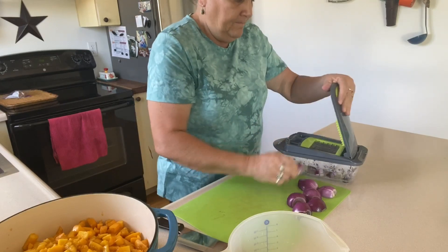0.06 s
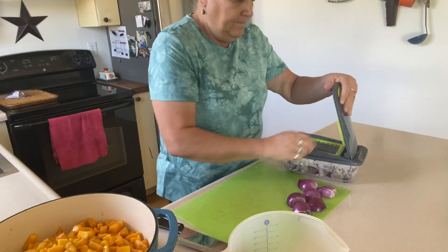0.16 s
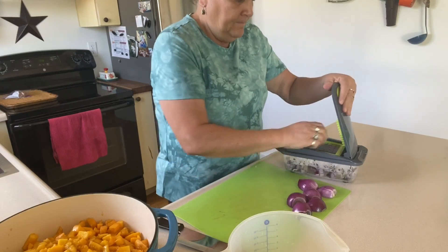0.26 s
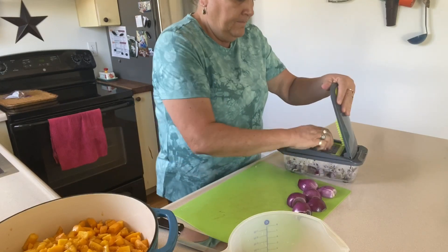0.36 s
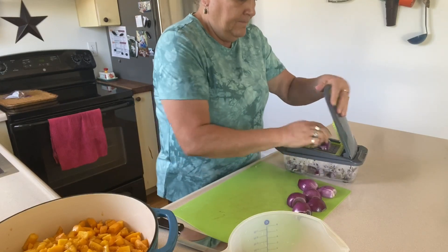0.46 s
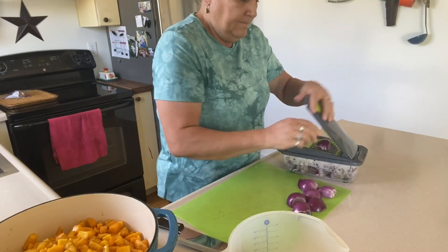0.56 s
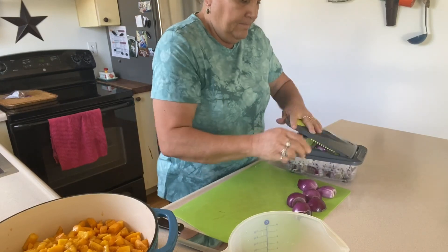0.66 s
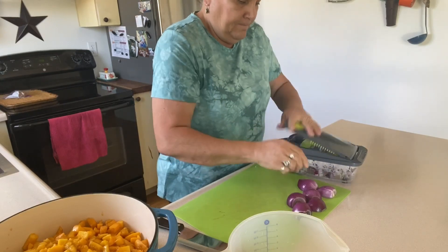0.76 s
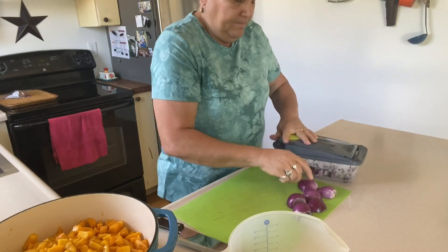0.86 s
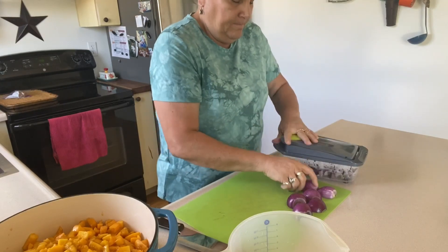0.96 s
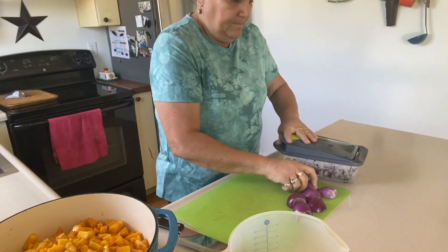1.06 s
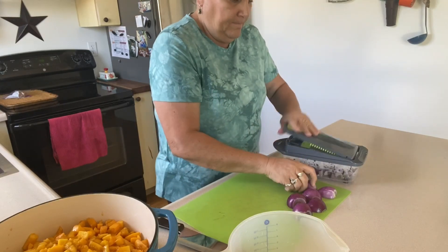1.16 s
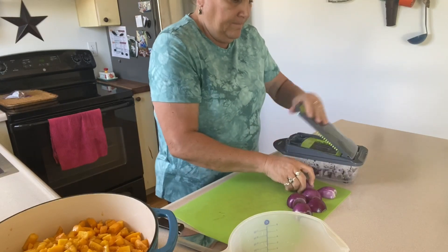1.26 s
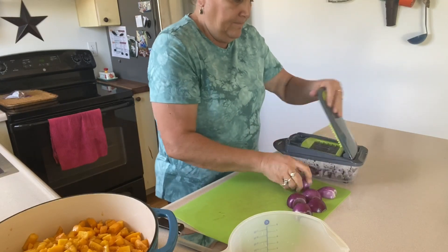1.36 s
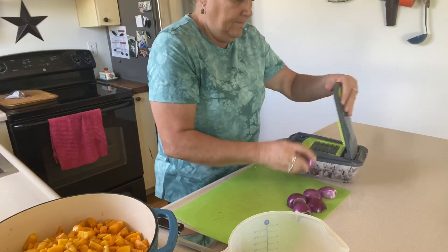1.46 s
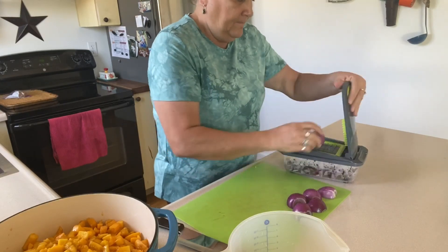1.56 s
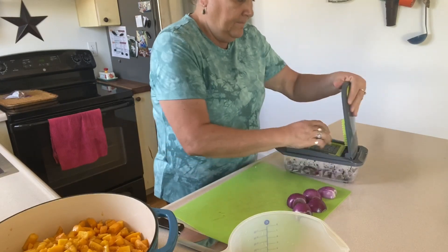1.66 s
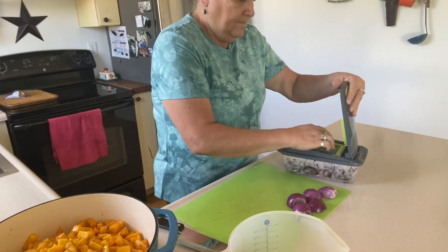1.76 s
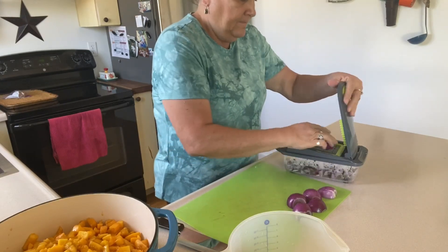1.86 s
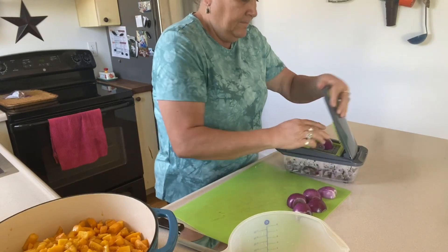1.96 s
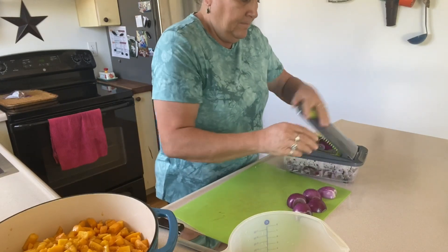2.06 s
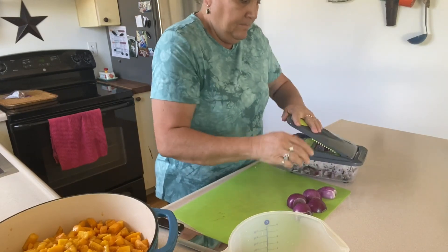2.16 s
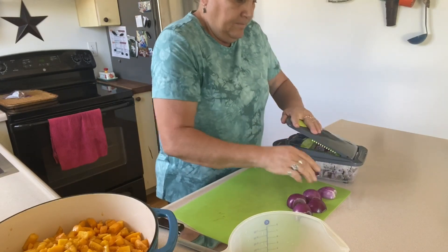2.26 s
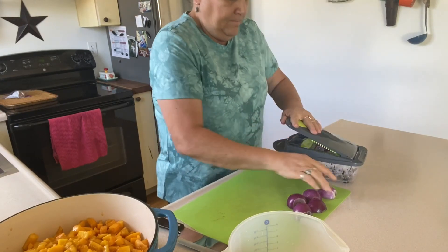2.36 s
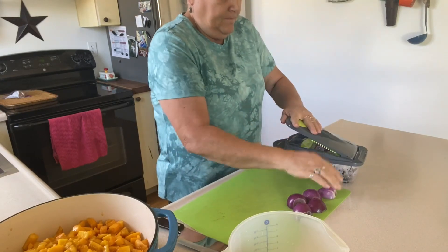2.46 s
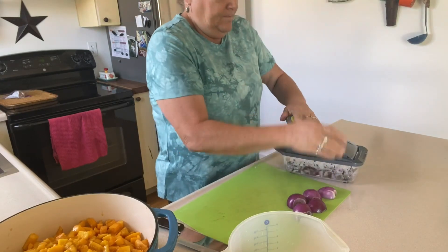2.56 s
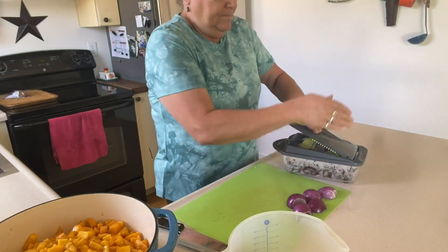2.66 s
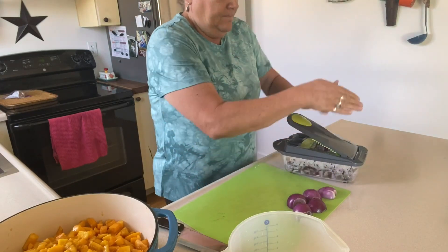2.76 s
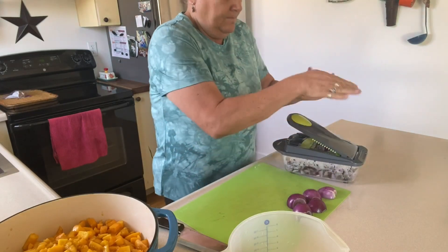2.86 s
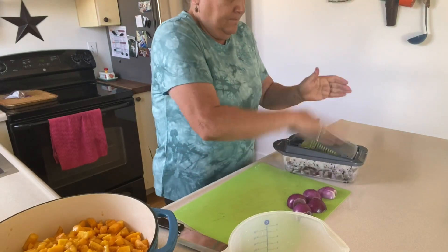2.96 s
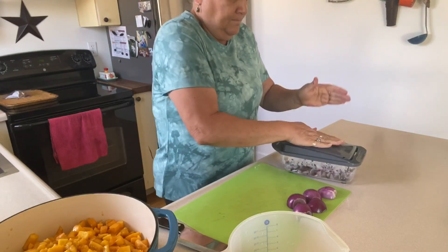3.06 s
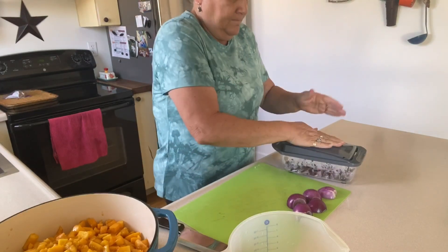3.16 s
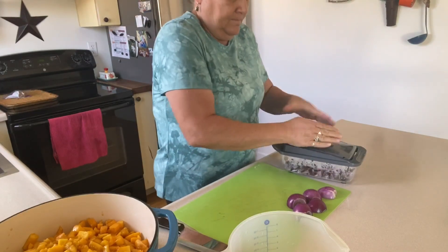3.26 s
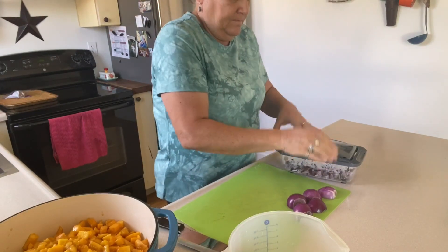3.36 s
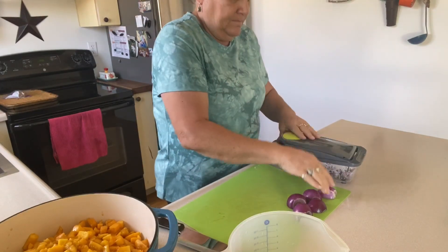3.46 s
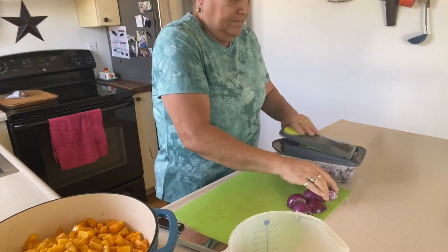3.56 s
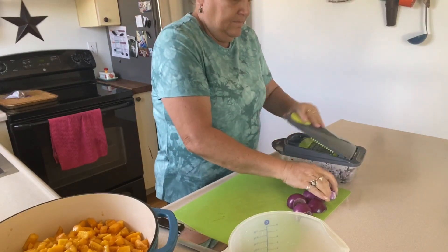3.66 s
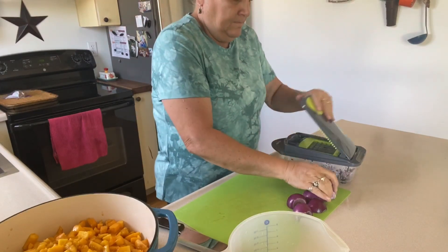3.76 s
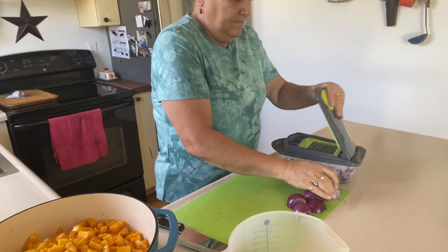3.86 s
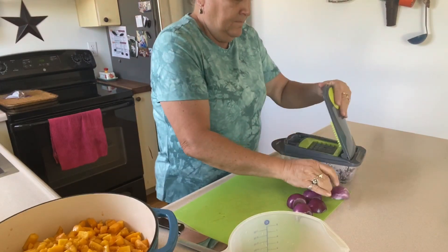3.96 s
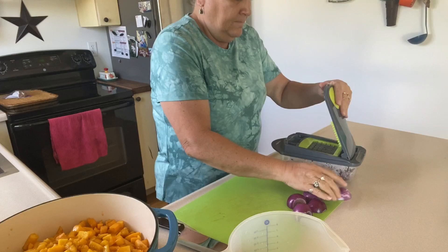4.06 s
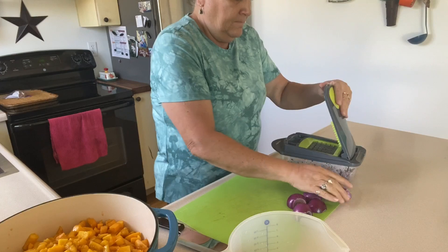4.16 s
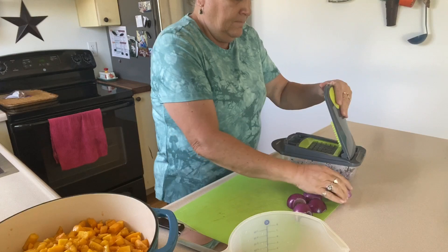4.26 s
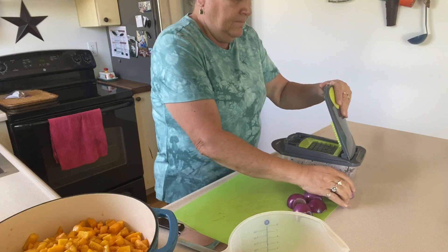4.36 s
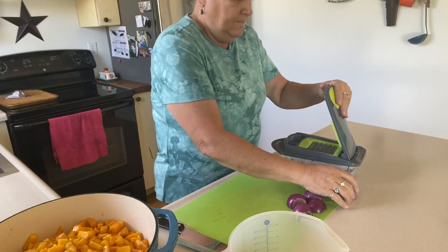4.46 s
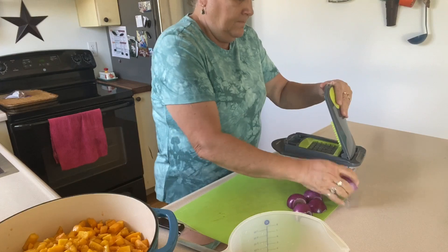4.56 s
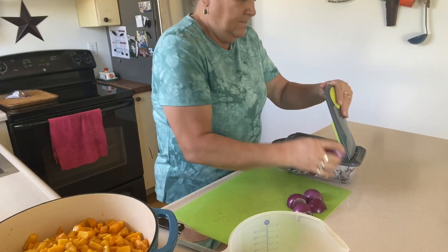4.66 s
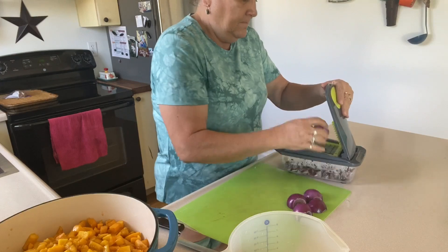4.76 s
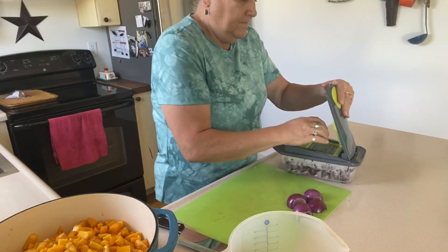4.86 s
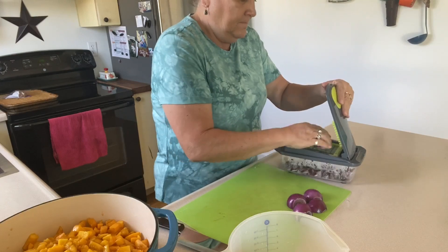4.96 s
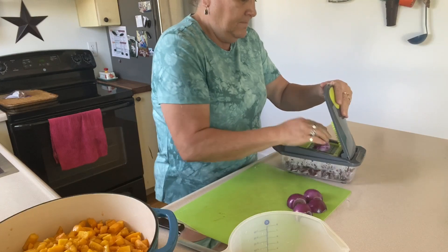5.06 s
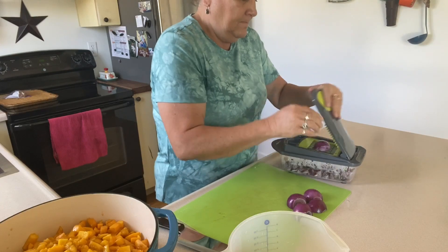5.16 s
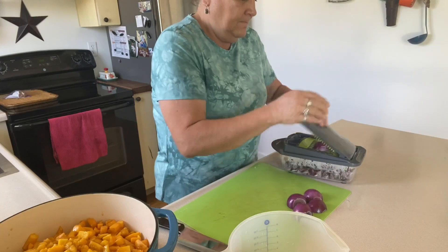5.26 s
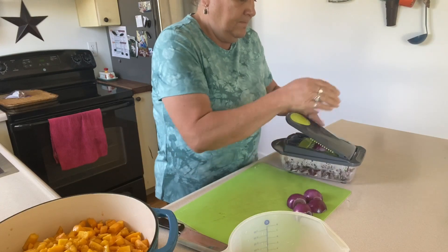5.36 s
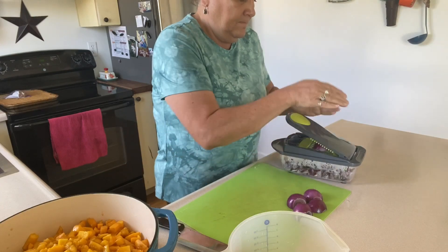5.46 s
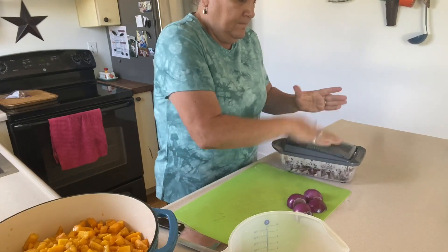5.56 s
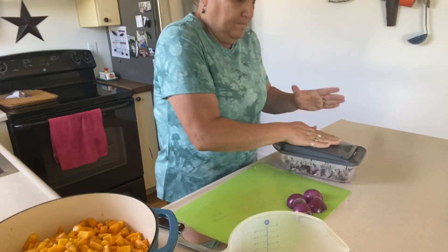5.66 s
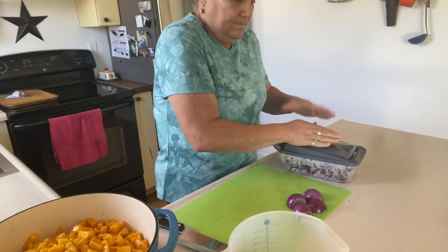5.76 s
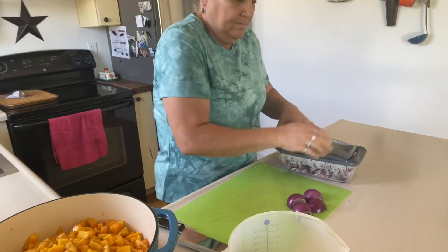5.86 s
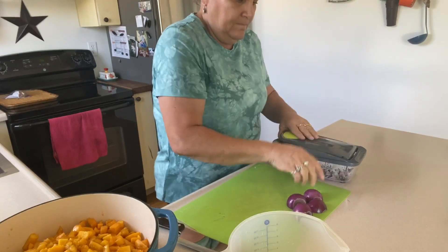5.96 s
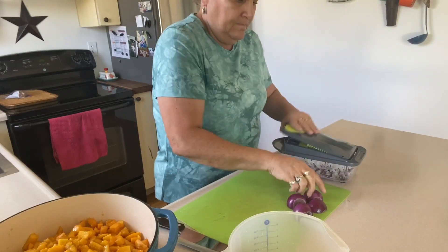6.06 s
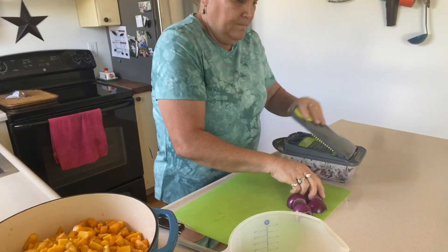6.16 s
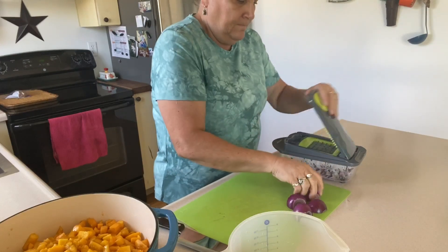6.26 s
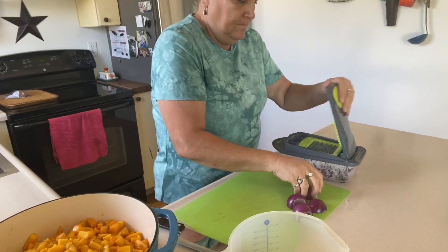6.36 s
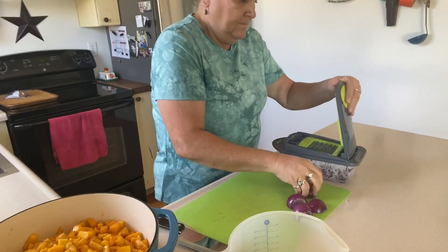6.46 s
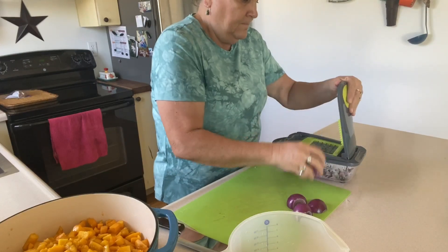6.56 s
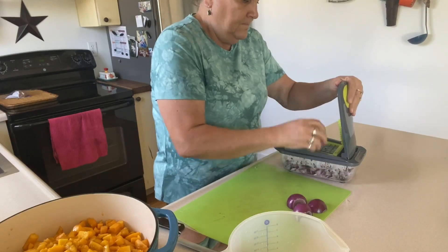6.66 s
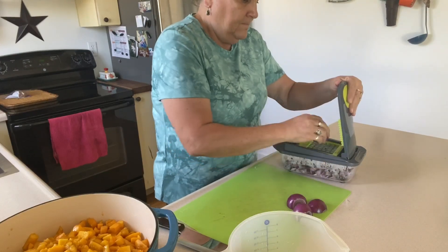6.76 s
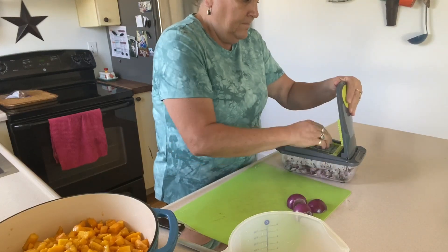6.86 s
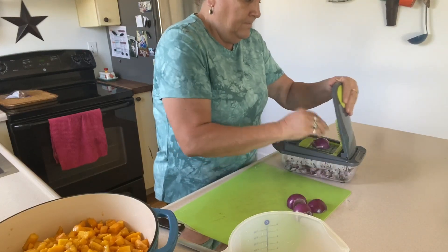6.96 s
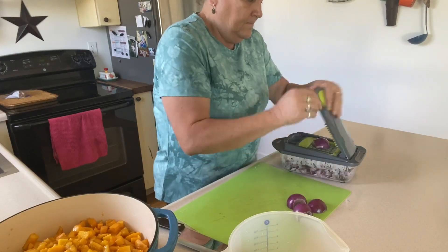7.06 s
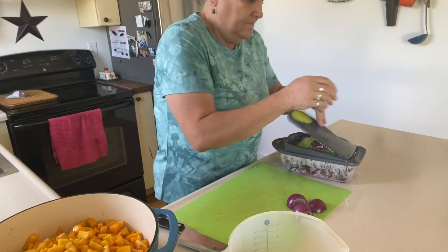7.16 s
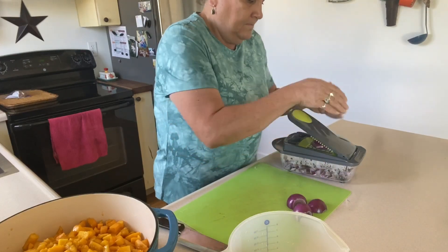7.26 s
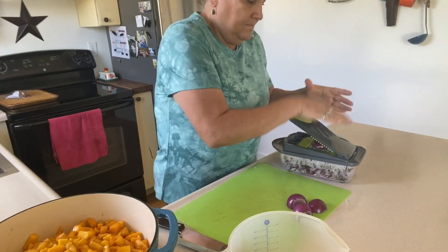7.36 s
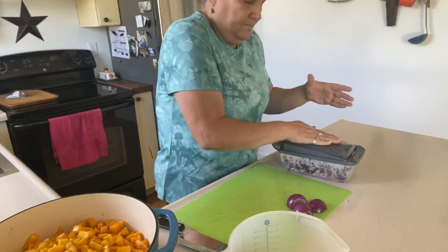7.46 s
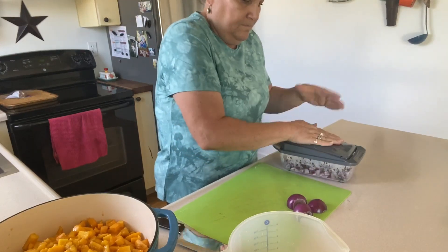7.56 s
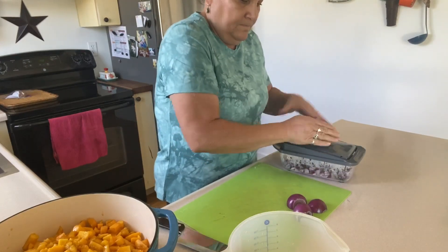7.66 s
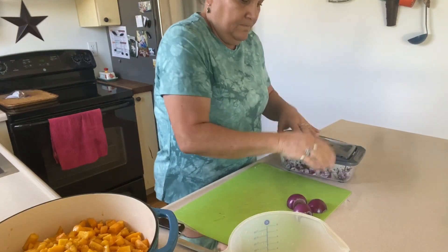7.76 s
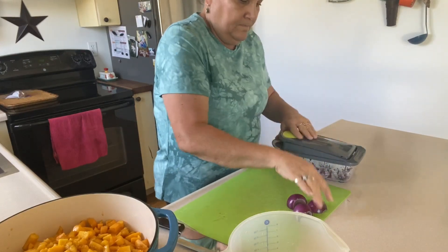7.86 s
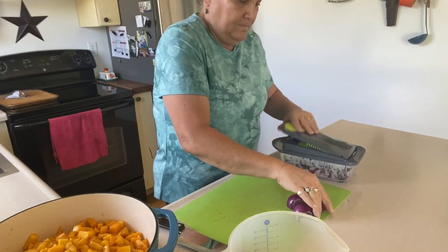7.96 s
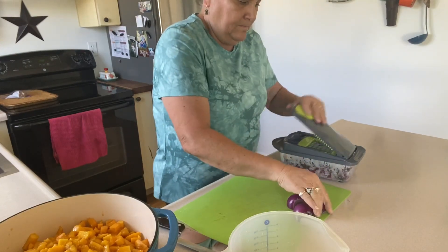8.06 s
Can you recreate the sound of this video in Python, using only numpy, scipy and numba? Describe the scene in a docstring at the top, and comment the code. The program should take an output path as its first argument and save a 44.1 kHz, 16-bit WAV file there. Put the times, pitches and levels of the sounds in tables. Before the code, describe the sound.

A plastic lever chopper dices onion on a kitchen counter. Four times, about two seconds apart, the lid crunches through with a very brief groan and clacks shut, thumping the counter. Before the first two strokes it sticks and scrapes faintly. Light hollow knocks and clicks fall between as onion is set down and the lid swings. The chopper is near the centre, with a short room echo over a low appliance drone.

```python
"""A kitchen counter, where a plastic lever chopper dices onion in four strokes.
Light hollow knocks come as onion is set down and the lid touches or swings open. The lid shears
through with a stick-slip groan and clacks shut amid short dull cracks. Twice it first sticks and
scrapes. The box rings, the counter thumps and the kitchen reverberates over quiet air and an
appliance drone. A limiter ducks each loud clack and lets the tail swell back."""
import sys
import numpy as np
from scipy import signal
from scipy.fft import rfft, irfft, next_fast_len
from scipy.io import wavfile
from scipy.ndimage import uniform_filter1d
from numba import njit

SR = 44100
rng = np.random.default_rng(int(sys.argv[2]) if len(sys.argv) > 2 else 0)


def dump_mix(stems):
    """Bounce the given channels to the path in sys.argv[1] as a 16-bit WAV at rate SR."""
    frames = np.atleast_2d(stems).T  # one column per channel
    limited = np.clip(frames, -1, 1)  # hard clip at full scale
    pcm = np.round(limited * 32767).astype(np.int16)
    wavfile.write(sys.argv[1], SR, pcm)


N = 357651

# room tone: freq_hz, level_db
AIR_EQ = [(20, -22), (36, -12), (58, 0.5), (85, -1.5), (160, -2), (250, -6.5), (400, -7.5), (630, -14),
          (1000, -19.5), (2000, -29.5), (3200, -38), (5500, -42.5), (11000, -54), (14000, -66)]
# noise bands of the appliance: centre_hz, width_hz, level_db
DRONE_BANDS = [(56.4, 13, -53.5), (122.8, 3.7, -61), (845.4, 78, -67)]
# decay of the kitchen reverb: freq_hz, t60_s
REVERB_DECAY = [(80, 0.3637), (300, .5), (1000, 0.6216), (2000, 0.5788), (4000, 0.59), (8000, 0.51),
                (15000, 0.36)]
# tone of the kitchen reverb: freq_hz, level_db
REVERB_EQ = [(50, -13.5), (120, -4), (190, -6.5), (250, -2), (380, -1), (480, -1.5), (650, -3.5), (900, -1),
             (1900, 0), (4000, -6), (8000, -4), (11000, -5.5), (12500, -18.5), (15000, -18)]
# left-right likeness of diffuse sound: freq_hz, correlation
STEREO_LIKENESS = [(60, 0.9), (200, 0.57), (500, -0.023), (1500, -0.099), (4000, 0.054), (8000, 0.25),
                   (13000, 0.58)]
# direct sound bends round the microphone and reaches the left side later: freq_hz, lag_rad
LEFT_LAG = [(500, 0.072), (2600, 1.5), (4300, 2), (6400, 2.1), (8500, 5.4), (10300, 6.7), (12300, 9.2),
            (16500, 6.5)]

# counter under the box: pitch_hz, soft_knock_db, hard_clack_db, t60_s
COUNTER_MODES = [(68.3, 1.5, -5, 0.41), (88, -11, -5, 0.084), (115, -15, -4.5, 0.23), (142, -10, -3, 0.17),
                 (165, -16, -6, 0.053)]
# plastic lid and box: pitch_hz, level_db, t60_s
BOX_MODES = [(244, 3.5, 0.088), (320, 0, 0.023), (396, -3.5, 0.06), (456.6, -5, 0.14), (510, -2.5, 0.028),
             (780, -9.5, 0.03), (908, -4, 0.045), (1100, -5.5, 0.055), (1429, 0, 0.035),
             (1575, -2.5, 0.035), (1760, -4, 0.012), (1964, -0.5, 0.06), (2155, -6.5, 0.034),
             (2350, -9.5, 0.035), (2580, -2, 0.033), (2875, -4.5, 0.025), (3140, -7.5, 0.028),
             (3830, -9.5, 0.015), (4260, -5, 0.04)]
# the box bottoming out on the counter: pitch_hz, level_db, t60_s
THUD_MODES = [(140.7, 0, .04)]
# blade grid: pitch_ratio, level_db, t60_s
GRID_MODES = [(.6, -11.5, .035), (.84, -2.5, .04), (1, 3.5, .05), (1.15, -5.5, 0.03), (1.45, -17, .03),
              (1.849, -9, .04), (2.1, -12, .05), (2.35, -16.5, .035), (3.6, -26, .03)]
# steel blades, pitched anew for each knock: pitch_ratio, level_db, t60_s
BLADE_MODES = [(.72, -8.5, 0.015), (.87, -3.5, .012), (1, -0.5, 0.013), (1.139, 0, .012),
               (1.33, -1.5, .012)]

# crunch of onion cells, also the tone of small clicks: freq_hz, level_db
CRUNCH_EQ = [(150, -3.5), (500, 0), (850, 5), (2000, -8.5), (4400, -7), (5500, -9.5), (7000, -15.5),
             (8500, -15.5), (11000, -16.5), (14500, -26), (16000, -26)]
# tone of the dull cracks and of the last cells giving way: freq_hz, level_db
DULL_CRACK_EQ = [(150, -3), (400, 1.5), (1000, -2), (1700, 2), (3000, -4.5), (4500, 1), (5600, -7.5),
                 (11000, -17.5), (16000, -34.5)]
# crack of the lid on the rim: freq_hz, level_db
RIM_EQ = [(100, -13.5), (400, 0), (850, 2), (1150, -4.5), (1700, -7.5), (3500, 1), (5500, -4.5), (7300, -7),
          (9000, -12), (11200, -9.5), (13000, -17), (14800, -9.5), (16000, -21.5)]
# hollow rattle of the blade tray in the box: freq_hz, level_db
TRAY_EQ = [(200, -10.5), (600, -8.5), (850, -2.5), (1150, -11), (1550, 2), (1900, -6), (2900, -8.5),
           (5000, -19), (15000, -40.5)]
# the tray's upper resonance, which moves with how it is seated: freq_ratio, level_db
SEAT_EQ = [(.6, -30), (.87, -9.5), (1, -0.5), (1.13, -10.5), (1.6, -30), (4, -46.5)]

# light clicks of hinge and onion skin: start_s, level_db, tilt_db_per_octave
TICK_CUES = [(0.6412, -35.5, 2.5), (1.532, -58, -6), (2.199, -49, 4), (2.322, -56, 3.5), (2.370, -59.5, 3)]
# light hollow knocks of the chopper (onion set down, lid touching or swinging open): start_s, grid_db,
# grid_hz, overtone_db_per_octave, tick_db, blades_db, blades_hz, box_db, thump_db
KNOCK_CUES = [(0.348, -28, 476.5, 3, -40, -48.5, 3500, -51.5, -38),
              (1.750, -43.5, 469, 5, -45, -47.5, 3420, -67, -42),
              (2.077, -33, 489.4, -5, -41, -50, 3700, -46, -40),
              (2.155, -44, 433, 0, -53, -62, 3700, -55.5, -24.5),
              (3.964, -52, 437, -6, -47.5, -63.5, 4200, -52, -42.5),
              (4.959, -40, 487, 10, -40, -53, 3070, -54, -54.5),
              (4.970, -32, 447, -1.5, -40.5, -43, 4070, -54, -42),
              (5.277, -28, 478, -3, -38.5, -48.5, 2750, -36, -25.5),
              (6.2895, -62, 663, -9, -55.5, -64, 3210, -71, -63),
              (6.844, -36, 475, -8, -39.5, -49.5, 3430, -53, -37),
              (7.155, -25.5, 463, -1, -39.5, -52, 3180, -35, -23.5)]
# pushes that stick in the onion: start_s, groan_hz, groan_db, scrape_length_s, scrape_db
STALL_CUES = [(0.610, 380.5, -25, 0.13, -51), (2.076, 423, -32, .33, -61)]
# short dull cracks just before and after the lid clacks shut: start_s, level_db
DULL_CRACK_CUES = [(0.7730, -26.5), (0.7844, -17.5), (0.7895, -17.5), (0.7965, -21), (2.9606, -25.5),
                   (2.9820, -13.5), (5.5540, -28), (5.5629, -6.5), (5.5830, -25.5), (7.3930, -29),
                   (7.4006, -27), (7.4108, -10.5)]
# full strokes: shut_s, travel_s, groan_hz, groan_db, load_db, clack_db, rattle_relative_db, seat_hz
CHOP_CUES = [(0.7795, 0.031, 378.7, -16, -26.5, 1, -10, 2230),
             (2.9732, 0.024, 382, -12.5, -7, 3, -9.5, 1677),
             (5.5602, .0320, 393.7, -21.5, -24, 0.5, -13, 1760),
             (7.4054, .0400, 389.5, -25.5, -23, -1, -7.5, 2080)]


def undb(db):
    """Decibels to gain."""
    return 10 ** (np.asarray(db) / 20)


def curve_at(points, hz):
    """A curve's value at these frequencies, on a log axis."""
    freqs, values = np.transpose(points)
    return np.interp(np.log(np.maximum(hz, 1)), np.log(freqs), values)


def clock(seconds):
    """Sample times of a short sound."""
    return np.arange(int(seconds * SR)) / SR


def fade(t, t60):
    """Exponential decay, 60 dB down after t60."""
    return np.exp(-np.log(1000) * t / t60)


def hit(x, db):
    """Scale a one-shot to the energy of 10 ms at this level."""
    return x * undb(db) / np.sqrt(np.mean(np.sum(x ** 2, axis=-1)) / (SR / 100))


def pan(x, db):
    """Place a sound by its left minus right level."""
    return x * undb(np.array([[db], [-db]]) / 2)


def add(track, start_s, x):
    """Mix a sound into the track."""
    i = int(start_s * SR)
    track[:, i:i + x.shape[-1]] += x[..., :N - i]


def eq(x, points, tilt_db=0):
    """Minimum-phase EQ, tilted by tilt_db per octave above 500 Hz."""
    n = next_fast_len(x.shape[-1] // 2 + 1024) * 2
    hz = np.fft.rfftfreq(n, 1 / SR)
    gain_db = curve_at(points, hz) + tilt_db * np.log2(np.maximum(hz, 500) / 2000)
    cepstrum = irfft(np.log(undb(gain_db)))
    cepstrum[1:n // 2] *= 2  # folded, so nothing rings ahead of an attack
    cepstrum[n // 2 + 1:] = 0
    return irfft(rfft(x, n) * np.exp(rfft(cepstrum)))[..., :x.shape[-1]]


def whiten(x):
    """Flatten a burst's spectrum, so no chance pitch sticks out."""
    spectrum = rfft(x)
    flat = irfft(spectrum / (np.abs(spectrum) + 1e-9), x.shape[-1])
    return flat * x.std() / flat.std()


def direct(x):
    """Sound straight from the chopper, arriving later on the left."""
    lag = curve_at(LEFT_LAG, np.fft.rfftfreq(len(x), 1 / SR))
    return np.array([irfft(rfft(x) * np.exp(-1j * lag), len(x)), x])


def diffuse(size):
    """Stereo white noise: near mono in the bass, wide in the mids."""
    n = next_fast_len(size, True)
    mid, side = rfft(rng.standard_normal((2, n)))
    likeness = np.clip(curve_at(STEREO_LIKENESS, np.fft.rfftfreq(n, 1 / SR)), -1, 1)
    mid, side = mid * np.sqrt((1 + likeness) / 2), side * np.sqrt((1 - likeness) / 2)
    return irfft(np.array([mid + side, mid - side]), n)[:, :size]


def ring(modes, push_s, spread=0, sharp=0, relax_s=0.0048):
    """Struck modes swell over the push; sharp starts them high to sag, spread widens them by phase."""
    t, out = clock(.6), 0
    bent_time = t + sharp * relax_s * (1 - np.exp(-t / relax_s))
    for k, (hz, db, t60) in enumerate(modes):
        phase = (-1) ** k * spread * np.array([[1], [-1]]) + k * np.pi
        out = out + undb(db) / np.sqrt(t60) * fade(t, t60) * np.sin(2 * np.pi * hz * bent_time + phase)
    return out * (1 - np.exp(-t / push_s))


def crack(spectrum, t60, tilt_db, chatter_db, chatter_t60, rise_s=0.00028):
    """A hard contact: a noise burst for its dense modes, then weaker chatter of loose parts."""
    t = clock(.2)
    attack = 1 - np.exp(-t / rise_s)
    burst = whiten(rng.standard_normal(len(t)) * fade(t, t60) * attack)
    contact = direct(burst) * (t < t[-1] / 2)
    chatter = diffuse(len(t)) * undb(chatter_db) * fade(t, chatter_t60) * attack
    return eq(contact + chatter, spectrum, tilt_db)


def room_tone(air_db=-52.5):
    """The bed: quiet air and the low drone of an appliance."""
    air = eq(diffuse(N), AIR_EQ)
    out = air / air.std() * undb(air_db)
    for hz, width_hz, db in DRONE_BANDS:
        band = signal.butter(2, [hz - width_hz / 2, hz + width_hz / 2], "band", fs=SR, output="sos")
        drone = signal.sosfilt(band, diffuse(N))
        out += drone / drone.std() * undb(db)
    return out


def kitchen_reverb(dry, wet_db=-1, build_s=0.00087):
    """Hard walls and cupboards: a diffuse tail that lasts longest in the mids."""
    t = clock(0.98)
    noise, hz = rfft(diffuse(len(t))), np.fft.rfftfreq(len(t), 1 / SR)
    centres, t60s = np.transpose(REVERB_DECAY)
    bands = [irfft(noise * curve_at(np.c_[centres, share], hz), len(t)) for share in np.eye(len(t60s))]
    tail = sum(band * fade(t, t60) for band, t60 in zip(bands, t60s)) * (1 - np.exp(-t / build_s))
    tail = eq(tail / np.sqrt(np.sum(tail ** 2) / 2), REVERB_EQ)
    return undb(wet_db) * signal.fftconvolve(dry, tail, axes=1)[:, :N]


def tick(db, tilt_db=0.0):
    """One small dry click."""
    return hit(crack(CRUNCH_EQ, t60=0.05, tilt_db=tilt_db, chatter_db=-24, chatter_t60=0.17), db)


def ticks():
    """The hinge clicks as the lid swings, and the skin as it splits."""
    out = np.zeros((2, N))
    for start_s, db, tilt_db in TICK_CUES:
        add(out, start_s, tick(db, tilt_db))
    return out


def knocks(scatter_db=5.5):
    """Light hollow knocks: a tick, blades and box ring, the grid's note sags, the counter hums."""
    out = np.zeros((2, N))
    counter = [(hz, soft_db, t60) for hz, soft_db, _, t60 in COUNTER_MODES]
    for (start_s, grid_db, grid_hz, overtone_db, tick_db,
         blades_db, blades_hz, box_db, thump_db) in KNOCK_CUES:
        grid = [(grid_hz * ratio, db + overtone_db * np.log2(max(ratio, 1)), t60)
                for ratio, db, t60 in GRID_MODES]
        blades = [(blades_hz * ratio, db, t60) for ratio, db, t60 in BLADE_MODES]
        # each light contact favours other box modes, mostly high ones; the hand damps them
        scatter = scatter_db * rng.standard_normal(len(BOX_MODES))
        box = [(hz, db + chance + 1.7 * np.log2(hz / 2000), t60 * 0.65)
               for (hz, db, t60), chance in zip(BOX_MODES, scatter)]
        touch = crack(CRUNCH_EQ, t60=.018, tilt_db=1.97, chatter_db=-13.5, chatter_t60=.22, rise_s=.002)
        add(out, start_s, hit(touch, tick_db - .5))
        add(out, start_s, hit(ring(blades, push_s=.0009, spread=1.0), blades_db))
        add(out, start_s, hit(ring(box, push_s=0.00065, spread=0.94), box_db))
        add(out, start_s + 0.00012, hit(ring(grid, push_s=0.0056, spread=0.75, sharp=0.048), grid_db))
        add(out, start_s + 0.0098, hit(ring(counter, push_s=0.011), thump_db))
    return out


def crunch(size, grain_db=4):
    """Bursting cells: millisecond grains of very uneven level, rms 1."""
    grains = undb(grain_db * np.repeat(rng.standard_normal(size), 40)[:size])
    cells = eq(diffuse(size) * grains, CRUNCH_EQ)
    return cells / cells.std()


def scrape(length_s, db):
    """Moist skin drags on the blades: a soft, bright rustle."""
    t = clock(length_s)
    skin = signal.lfilter([1, -.6], [1], crunch(len(t), grain_db=3.0))  # treble lift
    return skin / skin.std() * np.sqrt(np.sin(np.pi * t / length_s)) * undb(db)


def shear(length_s, groan_hz, groan_db, load_db, waver=0.078, release_t60=0.039):
    """Onion sticks and slips on the blades, so the lid groans while the cells crunch."""
    out, t = np.zeros((2, SR)), clock(.15)
    jitter = uniform_filter1d(rng.standard_normal((2, len(t))), size=96)
    slip, grip = jitter / jitter.std()
    phase = 2 * np.pi * np.cumsum(groan_hz * (1 + waver * slip)) / SR + np.array([[.45], [-.45]])
    swell = (1 - np.exp(-t / 0.0086)) * undb(3.3 * grip)
    release = fade(np.maximum(t - length_s + 0.0067, 0), release_t60)
    groan = (np.sin(phase) + 0.14 * np.sin(2 * phase)) * swell * release
    add(out, 0, pan(groan, -5.0) * np.sqrt(2) * undb(groan_db))
    # a heavier load crunches louder and bends the counter more
    bite = (1 - np.exp(-t / 0.0012)) * fade(np.maximum(t - length_s, 0), t60=0.013)
    add(out, 0, crunch(len(t)) * bite * undb(-22 + .6 * load_db))
    counter = [(hz, hard_db, t60) for hz, _, hard_db, t60 in COUNTER_MODES]
    add(out, length_s / 4, hit(ring(counter, push_s=0.0057), load_db))
    return out


def give_way(swell_s, db=-24):
    """The last cells collapse in a quick swell of noise."""
    t = clock(.06)
    swell = np.minimum(t / swell_s, 1) ** 1.3 * fade(np.maximum(t - swell_s, 0), t60=0.02)
    cells = eq(diffuse(len(t)), DULL_CRACK_EQ, tilt_db=-1.0)
    return cells / cells.std() * swell * undb(db)


def dull_cracks(box_relative_db=-16):
    """Short dull cracks just before and after the lid clacks shut, each ringing the box."""
    out = np.zeros((2, N))
    for start_s, db in DULL_CRACK_CUES:
        pop = crack(DULL_CRACK_EQ, t60=.022, tilt_db=1, chatter_db=-18.5, chatter_t60=.22, rise_s=.00055)
        add(out, start_s, hit(pop, db))
        add(out, start_s, hit(ring(BOX_MODES, push_s=.001, spread=.5), db + box_relative_db))
    return out


def clack(db, rattle_db, seat_hz, tilt_db=-0.15, thump_db=-5, box_tilt_db=-0.2):
    """The lid cracks on the rim: the tray rattles, the box rings and thuds, the counter thumps."""
    out = np.zeros((2, SR))
    scatter_db = 2 * rng.standard_normal(len(BOX_MODES))
    box = [(hz, mode_db + chance + box_tilt_db * np.log2(hz / 1000), t60)
           for (hz, mode_db, t60), chance in zip(BOX_MODES, scatter_db)]
    # the pressing hand damps the counter
    counter = [(hz, hard_db, t60 * 0.66) for hz, _, hard_db, t60 in COUNTER_MODES]
    seat_eq = [(seat_hz * ratio, band_db) for ratio, band_db in SEAT_EQ]
    rim = crack(RIM_EQ, t60=0.01, tilt_db=tilt_db, chatter_db=-19.5, chatter_t60=0.15)
    dull_rim = crack(RIM_EQ, t60=0.019, tilt_db=tilt_db - 3.5, chatter_db=-15.5, chatter_t60=0.16)
    tray = crack(TRAY_EQ, t60=0.041, tilt_db=-2.0, chatter_db=-15.5, chatter_t60=.17)
    seat = crack(seat_eq, t60=0.019, tilt_db=-1, chatter_db=-12, chatter_t60=0.34)
    thud = ring(THUD_MODES, push_s=0.0014, spread=0.13, sharp=0.98, relax_s=0.0055)
    add(out, 0, hit(rim, db - 6.5))
    add(out, .003, hit(dull_rim, db - 9.0))  # the rest of the rim lands a moment later
    add(out, .002, hit(tray, db + rattle_db + 0.5))
    add(out, .002, hit(seat, db + rattle_db - 5.0))
    add(out, 0, hit(ring(box, push_s=0.004, spread=0.4), db - 11.5))
    add(out, .002, hit(thud, db + thump_db - 4.5))
    add(out, 0, hit(ring(counter, push_s=0.005, spread=0.17), db + thump_db - 1.5))
    return out


def stalls(bite_s=.029, let_go_s=2.514):
    """Pushes too weak to cut: the lid bites, then creeps on scraping; once it is let go and clacks."""
    out = np.zeros((2, N))
    for start_s, groan_hz, groan_db, scrape_s, scrape_db in STALL_CUES:
        add(out, start_s + .002, tick(db=-42, tilt_db=2.5))
        add(out, start_s, shear(bite_s, groan_hz, groan_db, load_db=-25, waver=0.12, release_t60=0.029))
        add(out, start_s + bite_s, scrape(scrape_s, scrape_db))
    light_clack = clack(db=-41, rattle_db=-5.5, seat_hz=1900, tilt_db=-2, thump_db=-21.5, box_tilt_db=1.5)
    add(out, let_go_s, light_clack)
    return out


def chops(touch_lead_s=0.0055, touch_relative_db=-23.5, swell_s=0.016):
    """Full strokes: the lid ticks on the skin and shears in, the piece gives way, the lid clacks shut."""
    out = np.zeros((2, N))
    for shut_s, travel_s, groan_hz, groan_db, load_db, clack_db, rattle_db, seat_hz in CHOP_CUES:
        add(out, shut_s - travel_s - touch_lead_s, tick(groan_db + touch_relative_db))
        add(out, shut_s - travel_s, shear(travel_s, groan_hz, groan_db, load_db))
        add(out, shut_s - swell_s, give_way(swell_s))
        add(out, shut_s, clack(clack_db, rattle_db, seat_hz))
    return out


def scene():
    """The chopper, slightly to the right, with its reverb over the room tone."""
    chopper = pan(knocks() + stalls() + chops() + dull_cracks() + ticks(), -0.69)
    return chopper + kitchen_reverb(chopper) + room_tone()


@njit
def duck(over_db, hold_samples, release_db_per_sample):
    """Gain reduction in dB: instant attack, a hold, then a steady release."""
    out, cut_db, wait = np.empty(len(over_db)), 0., 0.
    for i in range(len(over_db)):
        wait -= 1
        if over_db[i] > cut_db:
            cut_db, wait = over_db[i], hold_samples
        elif wait < 0:
            cut_db = max(cut_db - release_db_per_sample, 0.)
        out[i] = cut_db
    return out


def record(dry, limit_db=-8.0, hold_s=0.14, release_db_per_s=95, top_hz=16400):
    """A limiter ducks the clacks and recovers in their tails; then soft clipping and a high cut."""
    power = uniform_filter1d(np.mean(dry ** 2, axis=0), size=130)
    over_db = 10 * np.log10(np.abs(power) + 1e-12) - limit_db
    cut_db = uniform_filter1d(duck(over_db, float(hold_s * SR), release_db_per_s / SR), size=48)
    high_cut = signal.ellip(8, .2, 70, top_hz, fs=SR, output="sos")
    return signal.sosfilt(high_cut, np.tanh(dry * undb(-cut_db)))


dry = scene()
out = record(dry)
dump_mix(out)
```